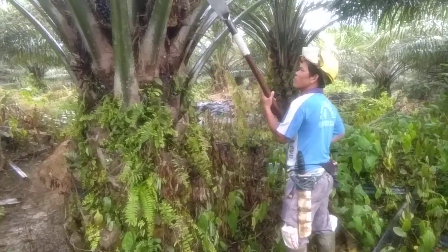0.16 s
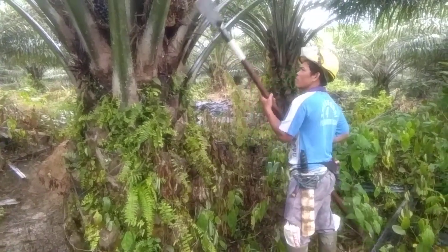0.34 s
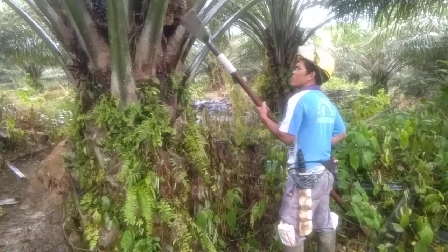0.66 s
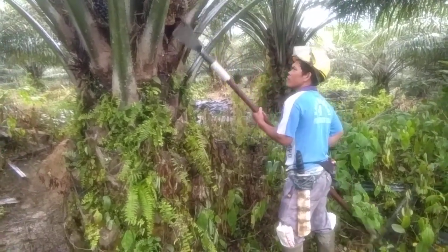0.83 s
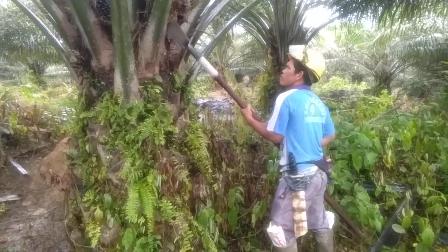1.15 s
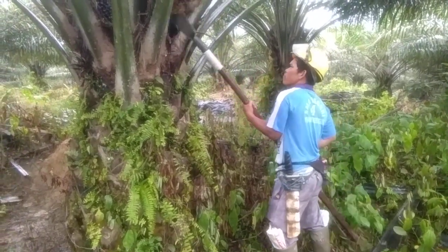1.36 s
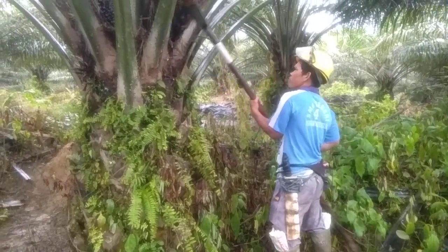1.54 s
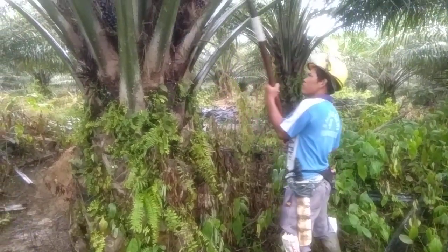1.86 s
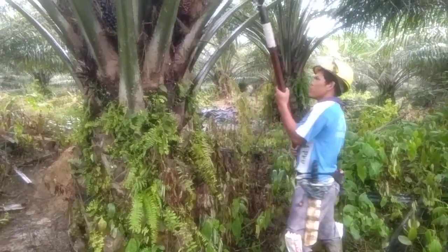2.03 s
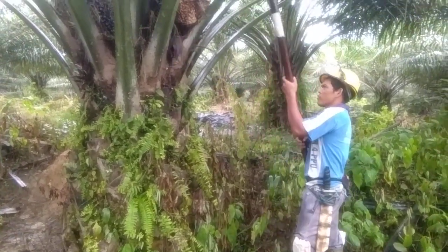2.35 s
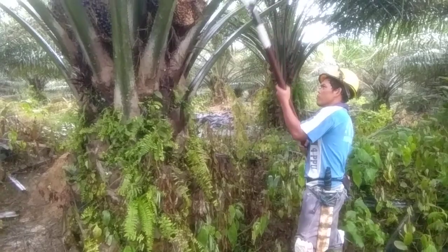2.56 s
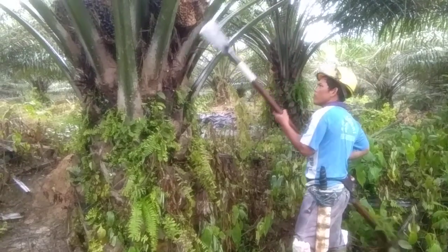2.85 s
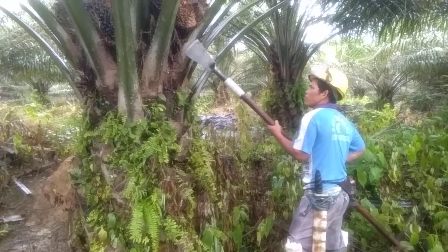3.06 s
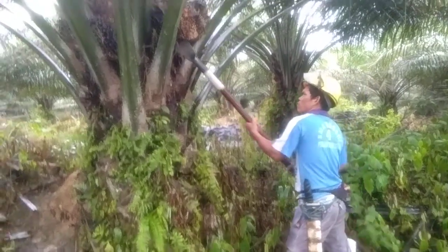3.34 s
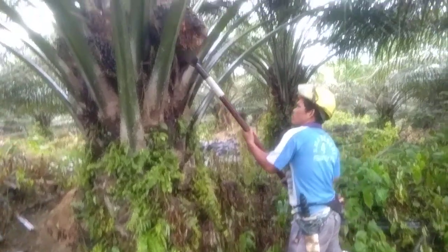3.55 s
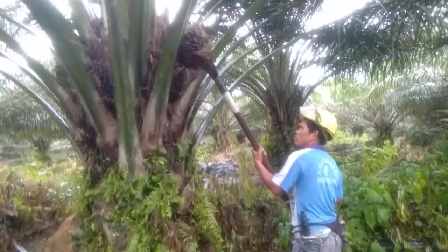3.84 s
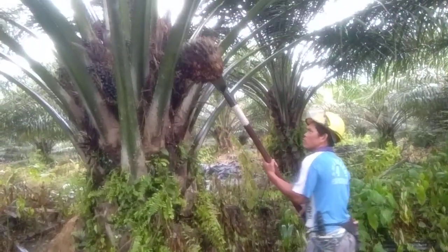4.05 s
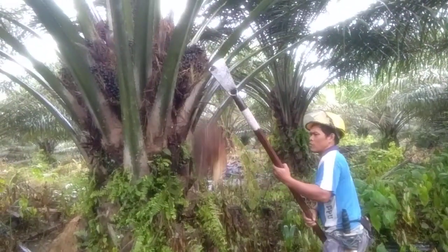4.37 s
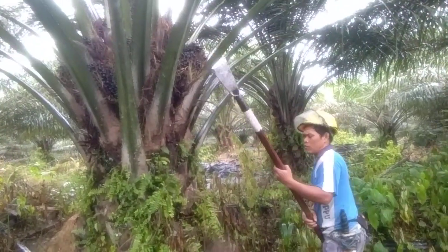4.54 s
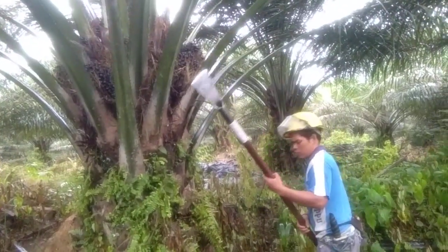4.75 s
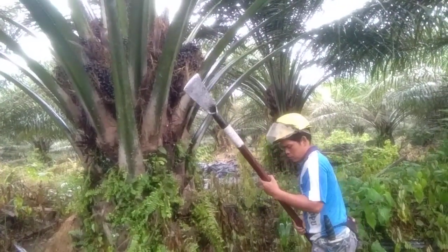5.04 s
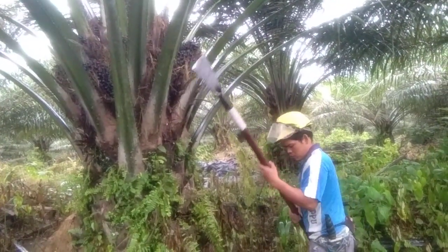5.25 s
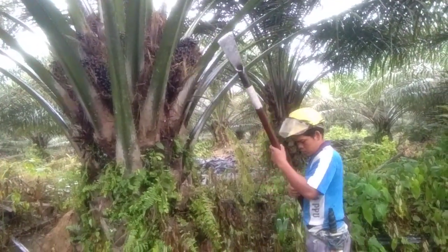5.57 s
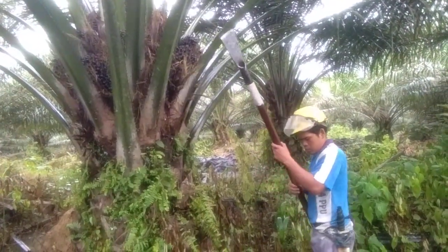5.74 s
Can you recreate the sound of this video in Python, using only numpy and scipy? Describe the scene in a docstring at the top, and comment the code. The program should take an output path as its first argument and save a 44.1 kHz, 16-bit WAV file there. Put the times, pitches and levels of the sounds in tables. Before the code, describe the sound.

Close, dry snapping and tearing of tough palm fibre in uneven clusters, then a short leafy thump, over faint outdoor hiss.

```python
"""In a palm plantation, close to the crown: a steel blade on a long pole bites in, fibres snap and tear,
and the loosened fruit bunch knocks a frond stalk and thuds into the undergrowth. Snaps are clicks with a ring
and noisy splinters, knocks are decaying notes with noise, and leaves and tears are dense coloured clicks.
Trunks and ground scatter the near sounds as noise tails; hiss and rumble lie far off. The snaps have the
colour of a small, peaky microphone port, and a soft limit keeps the loudest cracks below full scale."""
import sys
import numpy as np
from scipy import signal
from scipy.fft import rfft, irfft, next_fast_len
from scipy.io import wavfile
from scipy.ndimage import uniform_filter1d, map_coordinates

SR = 44100
rng = np.random.default_rng(int(sys.argv[2]) if len(sys.argv) > 2 else 0)


def transcribe(u):
    """Save the signal u as a 16-bit wav file named by the first command-line argument.

    u: samples, shape (n,) or (channels, n), limited to [-1, 1]; the rate is SR.
    q: integer samples, one column per channel.
    """
    v = np.clip(np.atleast_2d(u).T, -1, 1)
    q = np.round(v * 32767).astype(np.int16)
    wavfile.write(sys.argv[1], SR, q)


N = 260190

# colour of the far leaves and insects: (frequency [Hz], relative level [dB per Hz])
HISS_COLOUR = [(150, -24), (250, -16), (406, -5), (442, -10), (564, -7), (625, -11), (659, -6.5),
               (1010, -5.5), (2060, -5.5), (5340, -1), (7680, -8.5), (8820, -20.5), (9950, -15),
               (11400, -31), (15600, -25)]
# colour of the far rumble: (frequency [Hz], relative level [dB per Hz])
RUMBLE_COLOUR = [(12, -38), (20, -21), (32, -12), (44, -5), (98, 1.5), (140, -4), (236, -14), (300, -13),
                 (390, -21), (660, -120)]
# decay of the scatter among trunks and fronds: (frequency [Hz], time to fall 60 dB [s])
GROVE_DECAY = [(300, 0.12), (2000, 0.04), (6000, 0.21), (15000, 0.19)]
# steady stir of the leaves: (time [s], level [dB])
STIR_LEVEL = [(0, -48.5), (.2, -51), (.45, -52), (.8, -53.5), (1.2, -52.5), (1.5, -48.5), (2.3, -52.5),
              (2.9, -53), (3.1, -55), (3.3, -50.5), (3.48, -52), (3.535, -57), (3.6, -50), (3.85, -48.5),
              (4.2, -65), (4.33, -50.5), (4.6, -52.5), (4.85, -50.5), (5.05, -52), (5.4, -53.5),
              (5.65, -50.5), (5.9, -62)]
# fibres tear and fronds scrape: (start [s], length [s], level [dB], treble re level [dB], body re level [dB])
TEARS = [(0.268, .02, -43.5, -12, -28), (0.525, .015, -48, -23, -10), (1.239, 0.061, -41.5, -8, -6.5),
         (1.366, 0.043, -45, -28, -7.5), (1.626, 0.063, -43.5, -10, -12.5), (1.794, 0.053, -49.5, -3, -7),
         (1.947, .012, -54, -13, -1), (2.066, 0.023, -46.5, -5, -10.5), (2.18, 0.024, -46.5, -15, -4),
         (2.221, 0.013, -47.5, -10, -5.5), (2.36, 0.0066, -46.5, -28, -9), (2.87, 0.087, -54, -22, -4.5),
         (3.35, .05, -41.5, -12, -5.5), (3.409, 0.02, -35.5, -9, -16.5), (3.453, .015, -48, -13, -1.5),
         (3.564, 0.014, -43, -13, -6), (3.71, 0.014, -49.5, 9, 0), (3.73, 0.018, -42, -23, -23),
         (3.783, 0.033, -44.5, -11, -14), (3.884, 0.04, -47.5, 3, -8), (3.97, 0.04, -39, -11, -8.5),
         (4.072, 0.022, -45, -3, -22), (4.097, 0.017, -36, -17, -8.5), (4.172, 0.0051, -37.5, -12, -10),
         (4.229, 0.015, -43.5, -13, -25), (4.482, 0.014, -44.5, -30, -3), (4.708, 0.034, -42.5, -8, -6.5),
         (5.21, 0.011, -52, -27, -10), (5.47, 0.02, -49.5, -43.5, -9), (5.675, 0.055, -46.5, -21, -7),
         (5.832, 0.043, -49.5, -17, -2.5)]
# colour of leaf and fibre clicks within each register: (frequency [Hz], relative level [dB per Hz])
LEAF_COLOUR = [(120, -33.5), (200, -6), (462, -9.5), (690, -15), (874, -9), (1130, -8.5), (2250, -5.5),
               (2650, -1), (2900, -1), (3550, 0.5), (6240, 0), (9830, -36), (15500, -28.5)]
# the blade whines along the fibre: (start [s], length [s], mean pitch [Hz], level [dB])
SQUEAKS = [(1.757, .02, 3700, -48), (1.845, .125, 1765, -56), (4.245, .065, 3480, -47)]
# the bunch crushes the undergrowth: (time [s], level [dB])
CRUSH_LEVEL = [(4.73, -66), (4.736, -18.5), (4.741, -9), (4.747, -27), (4.753, -28), (4.763, -23.5),
               (4.772, -33), (4.8, -44), (4.86, -54), (4.92, -73)]
# colour of crushed twigs and leaves: (frequency [Hz], relative level [dB per Hz])
CRUSH_COLOUR = [(240, -46), (400, -11), (697, -18), (906, -6), (1510, -10.5), (2970, -7.5), (3210, -6),
                (6440, -9.5), (11000, -41), (14800, -42), (16000, -44)]
# contacts with the soil: (time [s], level added to the soil modes [dB])
THUDS = [(4.732, -21), (4.739, -2), (4.756, -8.5)]
# modes of the soil: (frequency [Hz], level before the contact's own [dB], time to fall 60 dB [s])
SOIL_MODES = [(61.4, -31, 0.18), (91, -22.5, 0.098), (131, -17.5, 0.041), (195.4, -22, 0.069),
              (300, -24, 0.029)]
# hollow knocks on stalk, pole and ground: (time [s], level [dB], pitch [Hz], overtone re note [dB],
# noise share [0-1])
KNOCKS = [(.510, -35.5, 228, -10.5, 0.2), (1.288, -17, 1930, -17, 0.55), (1.29, -34.5, 344, -32, 0),
          (1.414, -31.5, 905, -4, 0.2), (1.43, -26.5, 2740, -20.5, 0.23), (1.794, -39.5, 338, -27, .2),
          (2.025, -37, 420, -18, 0.33), (2.353, -33.5, 1114, -23, 0.34), (2.361, -35, 1160, -17, 0.07),
          (2.884, -44.5, 295, -24, 0.04), (2.941, -52, 300, -15, 0.4), (3.368, -26, 2510, -15, 0.5),
          (3.379, -22, 2580, -19, 0.55), (3.557, -37, 930, -24, 0.4), (3.578, -31, 1710, -21.5, 0.65),
          (3.5854, -33, 2240, -12, 0.2), (3.791, -39.5, 338, -17, 0.12), (4.461, -24, 1524, -8, .3),
          (4.465, -33, 1270, -1, 0.5), (4.497, -29.5, 684, 9.5, 0.22), (5.207, -41.5, 760, 2, .85),
          (5.2164, -42, 860, -9, 0.92), (5.225, -35, 510, -19, 0.4), (5.23, -43, 1180, -15, 0.2),
          (5.698, -42, 1130, -15, 0.1), (5.69, -42, 297, -13, 0.64), (5.83, -42, 830, -20, 0.4)]
# fibre snaps: (time [s], level [dB], ring [Hz], relative treble [dB], relative body [dB])
SNAPS = [(0.689, -25.5, 4240, -11.5, -6.5), (1.134, -32, 4840, -17, -10), (1.2274, -28, 3630, -14, -15),
         (1.239, -28, 4330, -12, -9), (1.2682, -32, 3900, -25, -7), (1.2884, -9.5, 3900, -23, -24),
         (1.291, -16.5, 4100, -7, 2), (1.365, -22.5, 3930, -8, -18), (1.3697, -22.5, 3630, -25, 1.5),
         (1.4146, -29.5, 3370, -8, -8), (1.4838, -28.5, 3080, -12, -8), (1.5389, -38, 3700, -6, -14),
         (1.5425, -20, 4500, -33, -14), (1.5543, -18.5, 5070, -14.5, -9.5), (1.577, -29, 3730, -24, -16),
         (1.5874, -29, 3920, -28, -14), (1.6093, -12, 4160, -7, -5), (1.6533, -17, 3900, -30, -15),
         (1.7835, -12.5, 3900, -6.5, -10.5), (1.9277, -33, 5000, -7, -13), (1.9532, -30, 3710, -5, -25),
         (1.9629, -29.5, 4380, -5, 0.5), (2.01, -28, 3520, -17, -2), (2.021, -12, 3300, 4, -12),
         (2.083, -38, 5070, -3, -3), (2.151, -24.5, 4860, 0.5, -6), (2.1733, -21, 3450, -38, -20),
         (2.2059, -32, 2470, -5, 1), (2.237, -36.5, 4990, 3, -10), (2.356, -30, 5000, -13, -9),
         (2.575, -29, 3440, -21, -18), (3.4293, -28, 4130, -5, 5.5), (3.6521, -23.5, 3380, -16, -3),
         (3.6896, -11, 3730, -4, -10), (3.7146, -11, 3550, -6, -15), (3.7202, -18, 4100, -11, -7),
         (3.734, -18.5, 4040, -10, -26), (3.754, -3, 3860, -18, -31), (3.7624, -14, 3570, -14, -14),
         (3.8221, -22, 3650, -23, -14), (3.8545, -31, 4820, -13, -5), (3.861, -33, 3700, -11, -10),
         (3.869, -33, 4800, -6, -14), (3.8751, -21, 3730, -25, -10), (3.8871, -23, 3700, -15, -6.5),
         (3.9036, -7.5, 3850, -25, -16), (3.9236, -11.5, 3800, -7.5, -7), (3.9636, -17, 3530, -47, -9),
         (3.9688, -28, 3850, -29, -1), (4.0012, -30, 4940, 6, 4), (4.027, -32, 3740, 9, -24),
         (4.0802, -27, 3920, -3, -21), (4.086, -21, 2100, 2, -4.5), (4.0936, -6, 3800, -10, -11),
         (4.1175, -18.5, 4330, -8, -4), (4.1252, -14.5, 3580, -29, -8), (4.1594, -20, 4900, -19, -23),
         (4.1643, -21, 4860, -21, -9), (4.1713, -30, 2620, -2, 6.5), (4.2264, -28.5, 5030, -24, -11),
         (5.161, -32.5, 4900, -14, -17), (5.37, -34, 4700, -17, -7), (5.6245, -30, 2590, -36, -3.5),
         (5.731, -29.5, 4230, -23, -19)]
# colour of a snap through the microphone port, within each register:
# (frequency [Hz], relative level [dB per Hz])
PORT_COLOUR = [(120, -33.5), (300, -34), (1000, -22), (2000, -18), (3000, -8), (3700, -0.5), (4500, -11),
               (5300, -7), (6400, -3), (7600, -17), (9000, -17.5), (11800, -20), (14500, -13.5),
               (15500, -14), (16600, -28)]
# overall tone, weak in deep bass and falling above 15.5 kHz: (frequency [Hz], gain [dB])
OVERALL_TONE = [(20, -24), (42, -8), (58, -5), (80, 1), (15450, -2), (15650, -14), (16600, -16)]

HISS_DB, RUMBLE_DB = -51.5, -61  # mean levels, about which they drift
STIR_TREBLE_DB, STIR_BODY_DB = -17, -13.5  # relative to the stir level
TEAR_RISE_DB_PER_S, TEAR_FALL_DB_PER_S = 475, 227
OVERTONE_RATIO = 1.62
# ring time of a -35 dB knock at 1 kHz; it goes as pitch ** -DAMPING
KNOCK_T60_AT_1K_S, DAMPING = 0.041, 0.18
HARD_SHORTER = 0.28  # dB of ring time lost per dB above -35: the contact damps hard blows
UPPER_DB, UPPER_FOLLOWS = 4, 0.28  # 5-8 kHz of a snap: base level, and dB gained per dB of treble
# splinter time at 0 dB of treble and body, and dB of time gained per dB of each
SPLINTER_T60_S, LONGER_BRIGHT, LONGER_DEEP = 0.043, 0.12, 0.24
SOFT_LIMIT, TOP_HZ = 0.8, 16650  # soft limit [amplitude] and upper limit of the sound [Hz]


def amp(db):
    """Gain of a level in dB."""
    return 10 ** (np.asarray(db) / 20)


def unit(x):
    """Scale to rms 1."""
    return x / np.sqrt(np.mean(x ** 2) + 1e-20)


def along(points, hz):
    """Interpolate (Hz, value) points on a log frequency axis."""
    f, v = np.transpose(points)
    return np.interp(np.log(hz + 1), np.log(f + 1), v)


def level_curve(rows):
    """Interpolate (s, dB) rows at every sample, near silence outside them."""
    s, db = np.transpose(rows)
    return np.interp(np.arange(N) / SR, s, db, left=-120, right=-120)


def wobble(rate):
    """A smooth random curve with rate knots a second."""
    knots = rng.standard_normal(int(N * rate / SR) + 4)
    return map_coordinates(knots, [np.arange(N) * rate / SR])


def kernel(points):
    """Causal (minimum-phase) impulse response of a spectrum, folded through its cepstrum."""
    size = 4096
    spectrum = amp(along(points, np.fft.rfftfreq(size, 1 / SR)))
    cepstrum = irfft(np.log(spectrum + 1e-5))
    cepstrum[1:size // 2] *= 2
    cepstrum[size // 2 + 1:] = 0
    return irfft(np.exp(rfft(cepstrum)))


def coloured(x, points):
    """Give x a causal colour."""
    return signal.fftconvolve(x, kernel(points))[:len(x)]


def band(x, lo_hz, hi_hz):
    """Causal band-pass."""
    return signal.sosfilt(signal.butter(3, [lo_hz, hi_hz], "band", fs=SR, output="sos"), x)


def registers(points, edges):
    """A click of the given colour, split at the given frequencies."""
    click = kernel(points)
    return [band(click, lo, hi) for lo, hi in zip(edges, edges[1:])]


def crackle(spread_db, share):
    """Tiny clicks of uneven size on a random share of all samples."""
    noise, size = rng.standard_normal((2, N))
    struck = rng.random(N) < share
    return unit(noise * struck * amp(spread_db * size))


def distance():
    """Far leaves and insects hiss in faint patches of time and pitch over a low rumble."""
    z = signal.stft(rng.standard_normal(N), nperseg=512)[2]
    patches = uniform_filter1d(rng.standard_normal(z.shape), 6, 0)
    patches = uniform_filter1d(patches, 12, 1)
    patchy = signal.istft(z * amp(1.13 * unit(patches)), nperseg=512)[1][:N]
    hiss = amp(HISS_DB + 0.58 * wobble(4.25)) * unit(coloured(patchy, HISS_COLOUR))
    rumble = unit(coloured(rng.standard_normal(N), RUMBLE_COLOUR))
    return hiss + amp(RUMBLE_DB + 0.77 * wobble(6.02)) * rumble


def grove(x):
    """Trunks, fronds and ground scatter sound into decaying noise, a new tail for each quarter second."""
    out, hop = np.zeros(N + SR), SR // 4
    delay = 60  # samples
    for start in range(0, N, hop):
        hz, t, z = signal.stft(rng.standard_normal(SR // 2), SR, nperseg=128)
        decay = amp(-60 * t / along(GROVE_DECAY, hz)[:, None])
        tail = signal.istft(z * decay, SR, nperseg=128)[1]
        wet = signal.fftconvolve(x[start:start + hop], tail / np.linalg.norm(tail))
        begin = start + delay
        out[begin:][:len(wet)] += wet[:len(out) - begin]
    return out[:N]


def rustle():
    """Dense fibre and leaf clicks come in clumps: a steady stir, and tears that swell, hold and fade."""
    t = np.arange(N) / SR
    stir_balance_db = np.array([[STIR_BODY_DB], [0], [STIR_TREBLE_DB]])
    power = amp(2 * (level_curve(STIR_LEVEL) + stir_balance_db))  # one row a register
    for s, length, db, treble_db, body_db in TEARS:
        before, after = np.maximum(s - t, 0), np.maximum(t - s - length, 0)
        loss_db = TEAR_RISE_DB_PER_S * before + TEAR_FALL_DB_PER_S * after
        balance_db = np.array([[body_db], [0], [treble_db]])
        power = power + amp(2 * (db - loss_db)) * amp(2 * balance_db)
    clumps_db = 2.2 * wobble(50) + 1.47 * wobble(250)
    grit = crackle(spread_db=3.0, share=0.2) * amp(clumps_db)
    clicks = registers(LEAF_COLOUR, [150, 2000, 8000, 18000])
    parts = [unit(signal.fftconvolve(grit, click)[:N]) for click in clicks]
    return np.sum(np.sqrt(power) * parts, axis=0)


def squeaks():
    """The blade slides along the fibre and whines: a brief sine with a wavering pitch."""
    out, waver = np.zeros(N), wobble(99)
    for s, length, hz, db in SQUEAKS:
        start, size = round(s * SR), round(length * SR)
        pitch = hz * (1 + 0.0037 * waver[start:start + size])
        phase = 2 * np.pi * np.cumsum(pitch) / SR
        out[start:start + size] += amp(db) * signal.windows.tukey(size, 0.5) * np.sin(phase)
    return out


def landing():
    """The bunch crushes twigs and leaves in a crackle while decaying soil modes thump three times."""
    crush = unit(coloured(crackle(spread_db=1.5, share=0.28), CRUSH_COLOUR))
    out = amp(level_curve(CRUSH_LEVEL)) * crush
    t = np.arange(SR // 4) / SR
    thump = sum(amp(db - 60 * t / t60) * np.sin(2 * np.pi * hz * t) for hz, db, t60 in SOIL_MODES)
    for s, db in THUDS:
        out[round(s * SR):][:len(t)] += amp(db) * thump
    return out


def knocks():
    """A struck body gives a short hollow note and overtone in a dull puff of noise around the pitch."""
    out, t = np.zeros(N + SR), np.arange(SR // 6) / SR
    for s, db, hz, overtone_db, noise_share in KNOCKS:
        t60 = KNOCK_T60_AT_1K_S * (hz / 1000) ** -DAMPING * amp(-HARD_SHORTER * (db + 35))
        envelope = amp(-60 * t / t60) * (1 - np.exp(-t / 0.0001))
        share = np.clip(noise_share, 0, 1)
        note = np.sin(2 * np.pi * hz * t)
        note += amp(overtone_db) * np.sin(2 * np.pi * OVERTONE_RATIO * hz * t)
        puff = unit(band(rng.standard_normal(len(t)), 0.5 * hz, 2 * hz))
        out[round(s * SR):][:len(t)] += amp(db) * envelope * ((1 - share) * note + share * puff)
    return out[:N]


def snaps():
    """A fibre breaks in one click with a brief ring, then splinters on in smaller, duller clicks."""
    out, t = np.zeros(N + SR), np.arange(SR // 8) / SR
    click_size = 1024  # samples
    click_t = t[:click_size]
    ring_envelope = amp(-60 * click_t / 0.0046) * (1 - np.exp(-click_t / 0.00035))
    parts = registers(PORT_COLOUR, [150, 2000, 5000, 8000, 18000])
    body, middle, upper, treble = [part[:click_size] / np.abs(part).max() for part in parts]
    for s, db, hz, treble_db, body_db in SNAPS:
        noise, size = rng.standard_normal((2, len(t)))
        t60 = SPLINTER_T60_S * amp(LONGER_BRIGHT * treble_db + LONGER_DEEP * body_db)
        splinters = 0.091 * noise * amp(2.1 * size - 60 * t / t60)
        ring = np.sin(2 * np.pi * hz * click_t) * ring_envelope
        bright = amp(treble_db) * treble
        dull = amp(body_db) * body + 0.83 * middle
        dull += amp(UPPER_DB + UPPER_FOLLOWS * treble_db) * upper
        splinter_click = dull + 0.43 * middle + 0.069 * ring + 0.5 * bright
        sound = signal.fftconvolve(splinters, splinter_click)
        sound[:click_size] += 0.54 * dull + 1.26 * ring + bright  # the first break
        out[round(s * SR):][:len(sound)] += amp(db) * sound
    return out[:N]


def scene():
    """Near sounds with their scatter, over the distance."""
    far = distance()
    near = rustle() + squeaks() + landing() + knocks() + snaps()
    return (far + amp(-6.5) * grove(near) + near)[None]


def record(dry):
    """Peaks are softly limited, deep bass is weak, treble drops above 15.5 kHz, none sounds above TOP_HZ."""
    soft = dry / (1 + np.abs(dry / SOFT_LIMIT) ** 4) ** (1 / 4)
    size = next_fast_len(N + 8192)
    hz = np.fft.rfftfreq(size, 1 / SR)
    tone = amp(along(OVERALL_TONE, hz)) * (hz < TOP_HZ)
    return irfft(rfft(soft, size) * tone, size)[:, :N]


dry = scene()
out = record(dry)
transcribe(out)
```